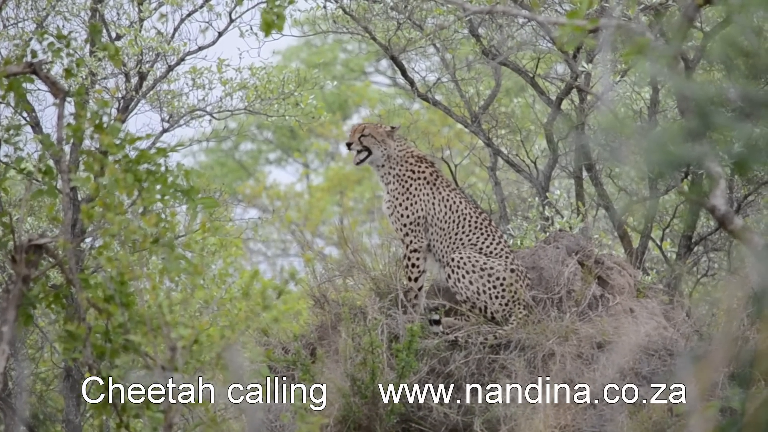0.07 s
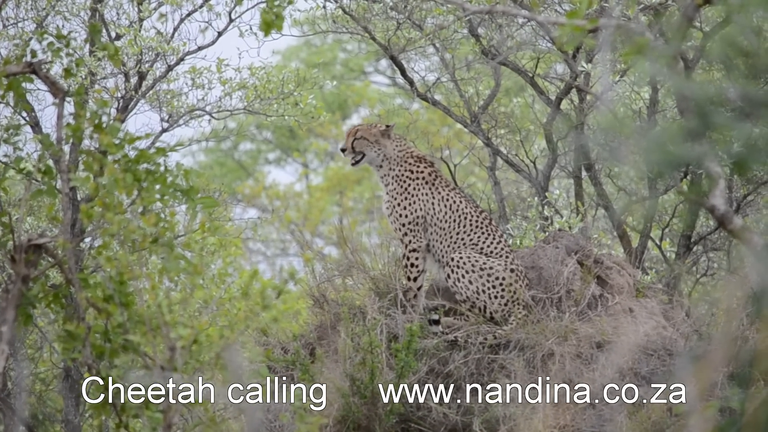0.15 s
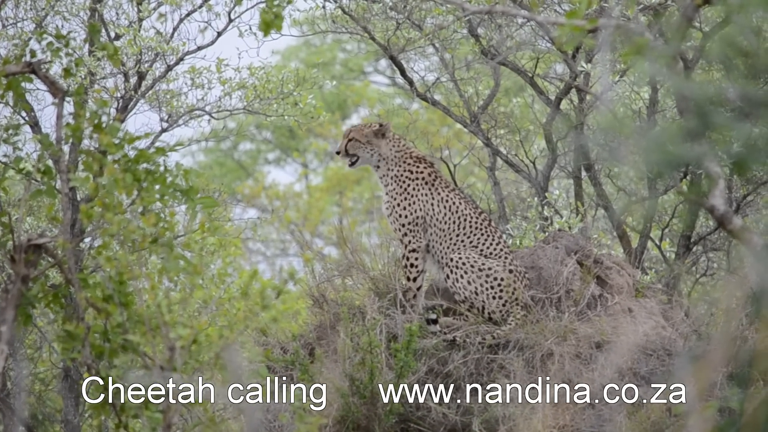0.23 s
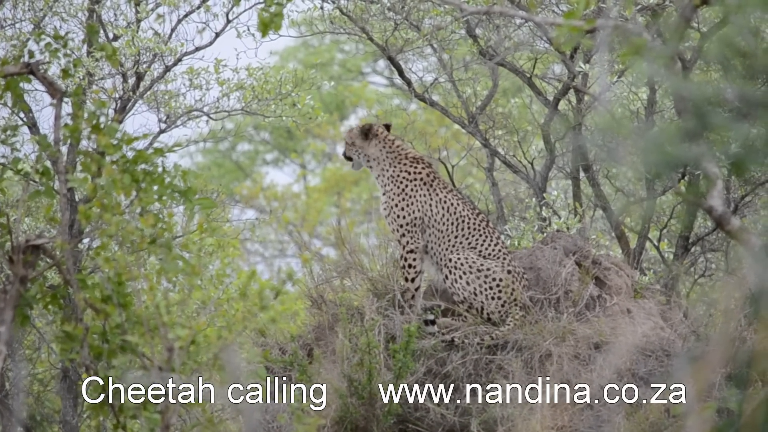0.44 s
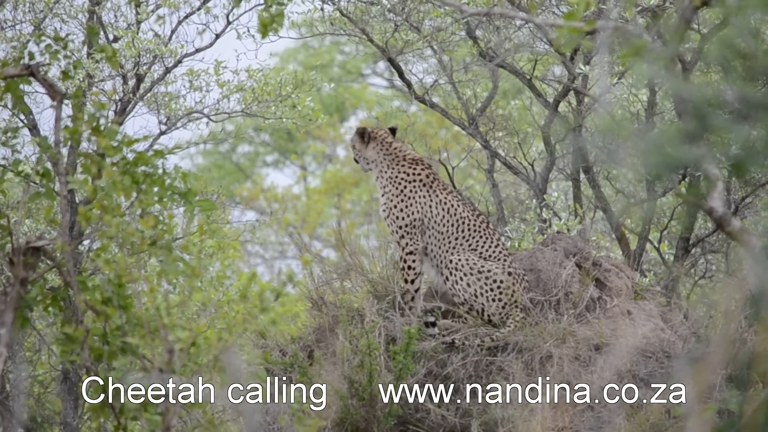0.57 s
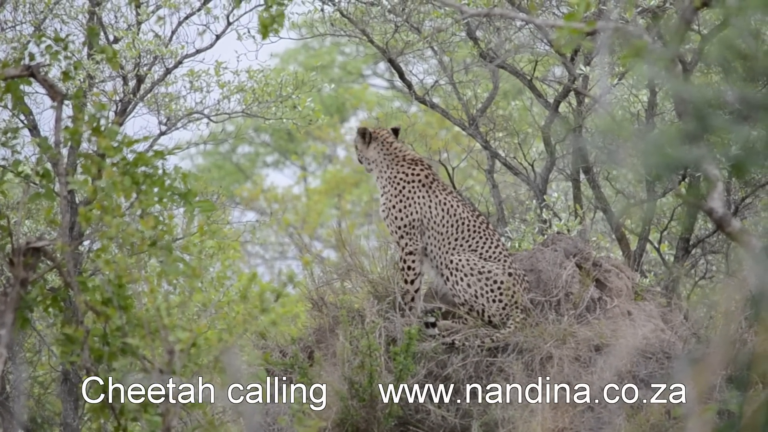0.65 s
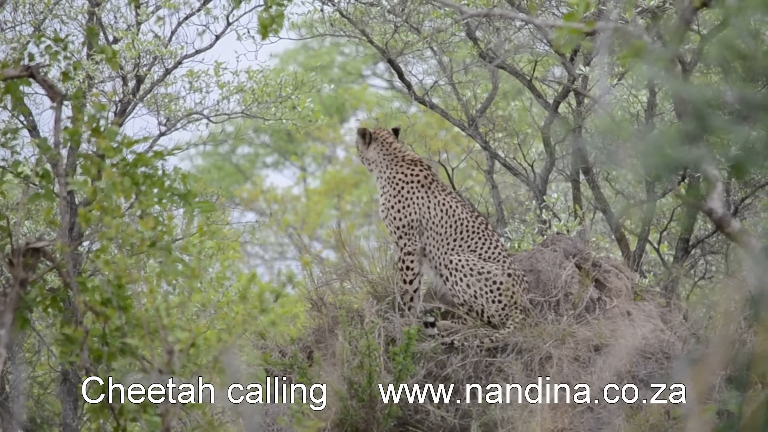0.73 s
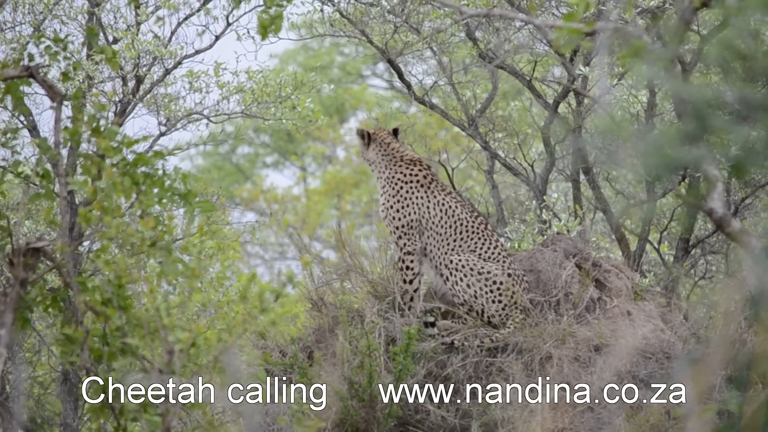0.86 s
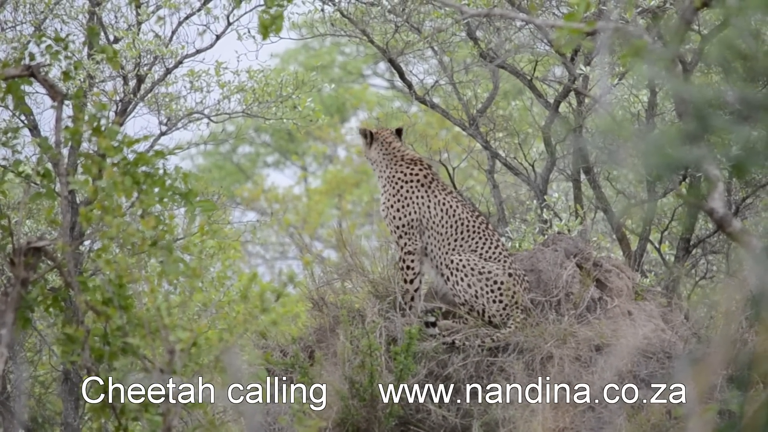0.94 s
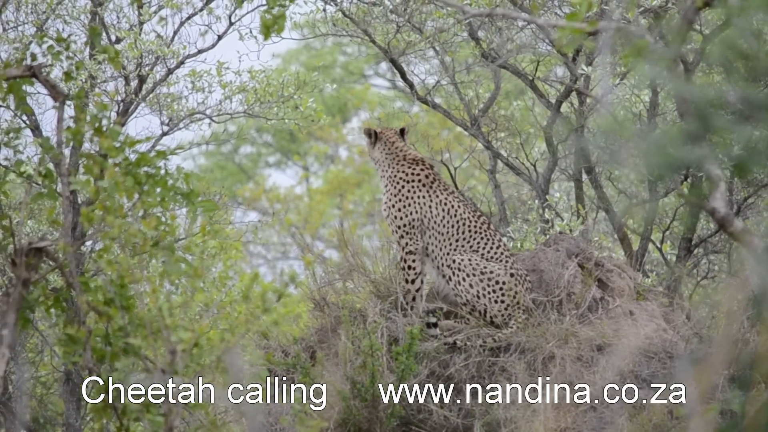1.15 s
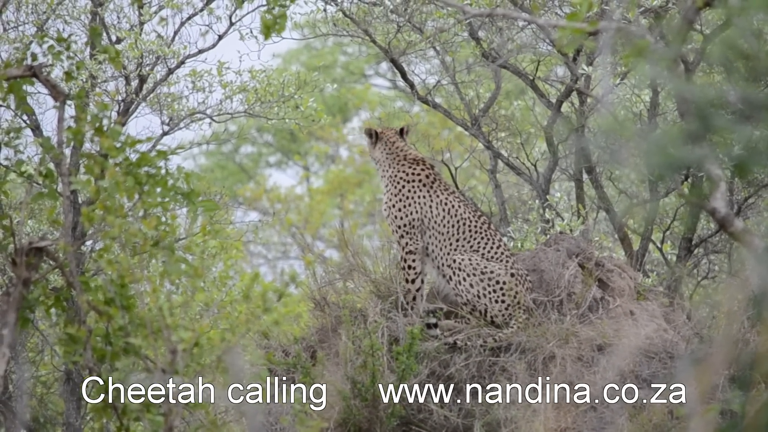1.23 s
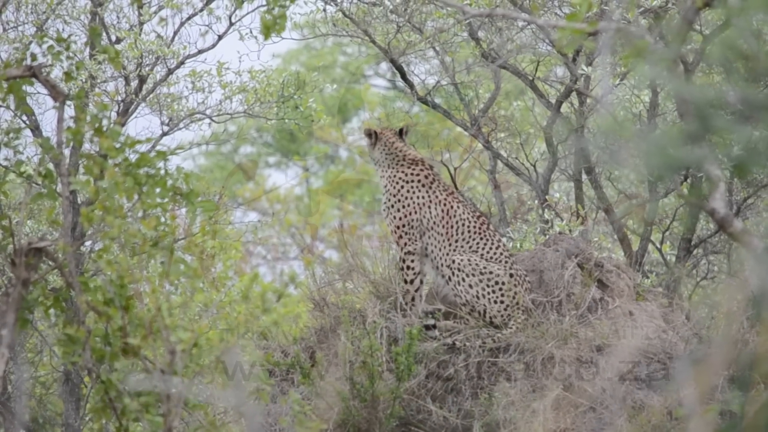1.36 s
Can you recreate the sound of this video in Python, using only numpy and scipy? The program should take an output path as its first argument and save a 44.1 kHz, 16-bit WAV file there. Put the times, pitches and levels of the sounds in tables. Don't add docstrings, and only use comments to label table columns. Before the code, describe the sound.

A cheetah chirps once, a quick yelp rising and falling in pitch, with faint echo off trees; an engine idles steadily nearby and a small bird repeats thin high whistles. Outdoors, one microphone a short way off.

```python
import sys
import numpy as np
from scipy import signal
from scipy.fft import rfft, irfft
from scipy.io import wavfile
from scipy.ndimage import uniform_filter1d

SR = 44100
rng = np.random.default_rng(int(sys.argv[2]) if len(sys.argv) > 2 else 0)


def to_wav(sig):
    pcm = np.clip(np.atleast_2d(sig), -1, 1) * 32767
    pcm = np.round(pcm).astype(np.int16)
    wavfile.write(sys.argv[1], SR, pcm.T)


def gain_from_decibels(decibels):
    exponent = np.asarray(decibels, float) / 20
    return 10 ** exponent


N = 61739
TIME_S = np.arange(N) / SR


def rms_one(x):
    return x / np.sqrt(np.mean(x ** 2) + 1e-20)


def at_hz(points, hz):
    point_hz, point_db = np.transpose(points)
    return np.interp(np.log(hz), np.log(point_hz), point_db)


def drift(rate_hz):
    r = np.exp(-2 * np.pi * rate_hz / SR)
    wander = signal.lfilter([1], [1, -2 * r, r * r], rng.standard_normal(N + SR))
    return rms_one(wander[SR:])


def band_pass(x, order, low_hz, high_hz):
    sos = signal.butter(order, [low_hz, high_hz], "band", fs=SR, output="sos")
    return signal.sosfilt(sos, x)


def resonate(x, hz, width_hz):
    r = np.exp(-np.pi * width_hz / SR)
    return signal.lfilter([1, 0, -1], [1, -2 * r * np.cos(2 * np.pi * hz / SR), r * r], x)


def bump(x, centre, width):
    return np.exp(-.5 * ((x - centre) / width) ** 2)


def gate(t, length_s, edge_s):
    return np.clip(t / edge_s, 0, 1) ** 2 * np.clip((length_s - t) / edge_s, 0, 1)


def scatter(x, t60_s, rise_s):
    t = np.arange(SR // 2) / SR
    cloud = rng.standard_normal(len(t)) * gain_from_decibels(-60 * t / t60_s) * np.clip(t / rise_s, 0, 1) ** 2
    return signal.fftconvolve(x, cloud / np.sqrt(np.sum(cloud ** 2)))[:N]


HUM_ORDERS = {4: -47, 6: -50, 7: -49, 8: -40, 9: -49, 32: -53, 36: -45}
# pitch_hz, width_hz, level_db
BODY_RESONANCES = [(55.4, 12, 0.5), (214, 9.4, -18), (322, 12, 3.5), (390.7, 8.2, 5.5), (499.5, 11, -4),
                   (656, 38, 4), (800, 14, 4), (1005, 6.7, -3.5), (1182, 8.7, 1), (1335, 32, -1),
                   (1533, 90, -6.5), (2045, 244, -8), (2745, 310, -9)]
# frequency_hz, level_db (per Hz)
HISS_SPECTRUM = [(25, -8), (55, -4), (90, -1), (600, 0), (1500, -3.5), (3000, -11.5), (4200, -16),
                 (6800, -17.5)]
CYCLE_HZ = 7.005
BODY_DB, HISS_DB, THROB_DB = -35, -32.5, .3


def engine_hum(turn):
    hum = 0
    for order, db in HUM_ORDERS.items():
        hum = hum + gain_from_decibels(db + 3 + 1.2 * drift(2.5)) * np.cos(order * turn)
    return hum


def engine_body():
    body = 0
    for hz, width_hz, db in BODY_RESONANCES:
        ring = rms_one(resonate(rng.standard_normal(N), hz, width_hz))
        body = body + gain_from_decibels(db) * ring * np.sqrt(width_hz)
    return rms_one(body)


def hiss_and_leaves():
    hiss = 0
    edges_hz = 20 * 2 ** np.arange(0, 9.6, .5)
    white = rng.standard_normal((2, N + SR))
    for k, (low_hz, high_hz) in enumerate(zip(edges_hz, edges_hz[1:])):
        band = band_pass(white[k % 2], 2, low_hz, high_hz)[SR:]
        hiss = hiss + gain_from_decibels(at_hz(HISS_SPECTRUM, np.sqrt(low_hz * high_hz)) + 1.24 * drift(4.7)) * band
    return rms_one(hiss)


def engine():
    turn = 2 * np.pi * CYCLE_HZ * (TIME_S - .63)
    noise = gain_from_decibels(BODY_DB) * engine_body() + gain_from_decibels(HISS_DB) * hiss_and_leaves()
    return engine_hum(turn) + gain_from_decibels(THROB_DB * np.cos(4 * turn)) * noise


# start_s, level_db (rms), top_hz, length_s, low_voice_db
BIRD_NOTES = [
    (.038, -50, 6950, .07, -9),
    (.256, -48, 7050, .065, -14),
    (.472, -47, 7080, .066, -14),
    (.686, -49, 7000, .064, -11),
    (.902, -49, 6950, .055, -7),
    (1.118, -49, 6930, .06, -14),
    (1.336, -49, 6950, .045, -6),
]
START_HZ, RISE_S = 4200, .016
FLICKER_DB, WOBBLE_HZ = 2.5, 45
LOW_VOICE_HZ, LOW_VOICE_RISE_HZ_S, LOW_VOICE_AT_S, LOW_VOICE_S = 5400, 14000, .026, .006
BIRD_ECHO_DB, BIRD_ECHO_T60_S, BIRD_ECHO_RISE_S = -3, .13, .0028


def bird():
    song = 0
    flicker = gain_from_decibels(FLICKER_DB * drift(140))
    wobble_hz = WOBBLE_HZ * drift(150)
    for start_s, db, top_hz, length_s, low_db in BIRD_NOTES:
        t = TIME_S - start_s
        hz = top_hz - (top_hz - START_HZ) * np.exp(-(t / RISE_S) ** 2) + wobble_hz
        whistle = np.sin(2 * np.pi * np.cumsum(hz) / SR) * gate(t, length_s, .006)
        u = t - LOW_VOICE_AT_S
        low_cycles = LOW_VOICE_HZ * u + .5 * LOW_VOICE_RISE_HZ_S * u * u
        low_voice = np.sin(2 * np.pi * low_cycles) * bump(u, 0, LOW_VOICE_S)
        song = song + gain_from_decibels(db + 5.5) * (whistle + gain_from_decibels(low_db) * low_voice)
    song = song * flicker
    return song + gain_from_decibels(BIRD_ECHO_DB) * scatter(song, BIRD_ECHO_T60_S, BIRD_ECHO_RISE_S)


# delay_s, level_db
TRUNK_ECHOES = [(.016, -17), (.025, -21), (.036, -22), (.052, -19), (.064, -22)]
SCATTER_DB, SCATTER_RISE_S, SCATTER_T60_S = -15, .035, .3
SCATTER_LOW_HZ, SCATTER_HIGH_HZ = 1580, 3880


def trees(call):
    back = gain_from_decibels(SCATTER_DB) * scatter(call, SCATTER_T60_S, SCATTER_RISE_S)
    for delay_s, db in TRUNK_ECHOES:
        back = back + gain_from_decibels(db) * np.interp(np.arange(N) - delay_s * SR, np.arange(N), call)
    return band_pass(back, 1, SCATTER_LOW_HZ, SCATTER_HIGH_HZ)


# time_s, pitch_hz, effort_db, mouth_db (lift of the overtones as the mouth opens)
CHIRP_COURSE = [
    (.191, 773, -37.5, -7),
    (.204, 800, -28.5, -5),
    (0.225, 1022, -20.5, 3.5),
    (0.243, 1053, -16.5, 3.5),
    (0.252, 1039, -18, 8),
    (0.269, 967.4, -15, 2.5),
    (.283, 887.3, -22.5, 7.5),
    (0.3, 813, -26.5, 4),
    (0.326, 725, -36.5, -9),
]
# frequency_hz, level_db
THROAT_SPECTRUM = [(790, -26), (865, -1), (2050, 1), (2400, -8.5), (3050, 5), (3350, -6.5), (4900, -29.5),
                   (10500, -34.5)]
# frequency_hz, width_hz, level_db
MOUTH_RIPPLES = [(1600, 60, 7), (2680, 45, 4), (3470, 55, 9), (3850, 80, 8), (4215, 60, 13), (6080, 90, 14),
                 (5700, 100, 4), (6330, 70, 4), (1725, 35, -11), (1870, 40, -7), (2580, 40, -8),
                 (2815, 42, -18), (3270, 80, -12), (3640, 55, -10)]
CHIRP_EDGE_S, BREATH_DB = .002, -28
TREMBLE, SHIMMER_DB = .001, .13


def chirp():
    time_s, pitch_hz, effort_db, mouth_db = np.transpose(CHIRP_COURSE)
    f0 = uniform_filter1d(np.interp(TIME_S, time_s, pitch_hz), size=300) * (1 + TREMBLE * drift(150))
    mouth = uniform_filter1d(np.interp(TIME_S, time_s, mouth_db), size=300)
    phase = 2 * np.pi * np.cumsum(f0) / SR
    voice = 0
    for k in range(1, 14):
        db = at_hz(THROAT_SPECTRUM, k * f0)
        db = db + mouth * (1 - 1 / k) * np.exp(-(k / 10.4) ** 4)
        db = db + SHIMMER_DB * k ** 1.64 * drift(130)
        for hz, width_hz, ripple_db in MOUTH_RIPPLES:
            db = db + ripple_db * bump(k * f0, hz, width_hz)
        voice = voice + gain_from_decibels(db + 3) * np.sin(k * phase + .8 * k * k)
    breath = rms_one(band_pass(rng.standard_normal(N), 2, 1500, 6000))
    voice = voice + gain_from_decibels(BREATH_DB) * breath * (1 + np.cos(phase))
    effort = gain_from_decibels(uniform_filter1d(np.interp(TIME_S, time_s, effort_db), size=200))
    return voice * effort * gate(TIME_S - time_s[0], time_s[-1] - time_s[0], CHIRP_EDGE_S)


def scene():
    cat = chirp()
    return (engine() + bird() + trees(cat) + cat)[None]


def top_cut(x):
    return signal.sosfilt(signal.butter(12, 11590, fs=SR, output="sos"), x)


TOP_SHELF_HZ, SHELF_WIDTH_HZ, TOP_DB = 7120, 200, -8.5
DIP_HZ, DIP_WIDTH_HZ, DIP_DB = 8020, 170, -5
ROLL_HZ, CUTOFF_HZ = 9570, 11700
SETTLE_DB, SETTLE_S = -2, .036


def record(dry):
    settled = dry * gain_from_decibels(SETTLE_DB * np.exp(-TIME_S / SETTLE_S))
    hz = np.fft.rfftfreq(N, 1 / SR)
    db = TOP_DB / (1 + np.exp(np.clip((TOP_SHELF_HZ - hz) / SHELF_WIDTH_HZ, -50, 50)))
    db = db + DIP_DB * bump(hz, DIP_HZ, DIP_WIDTH_HZ)
    db = db - 9.6 * np.clip((hz - ROLL_HZ) / 1000, 0, None) ** 1.28
    db = db - 60 * (hz > CUTOFF_HZ)
    mix = irfft(rfft(settled) * gain_from_decibels(np.maximum(db, -140)), N)
    return top_cut(mix)


dry = scene()
out = record(dry)
to_wav(out)
```